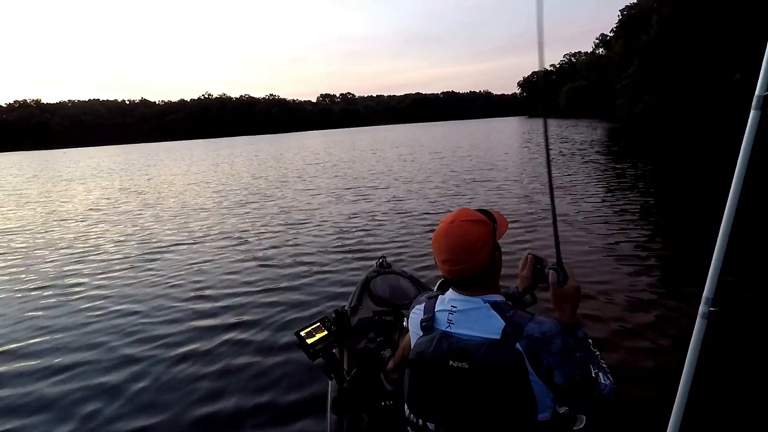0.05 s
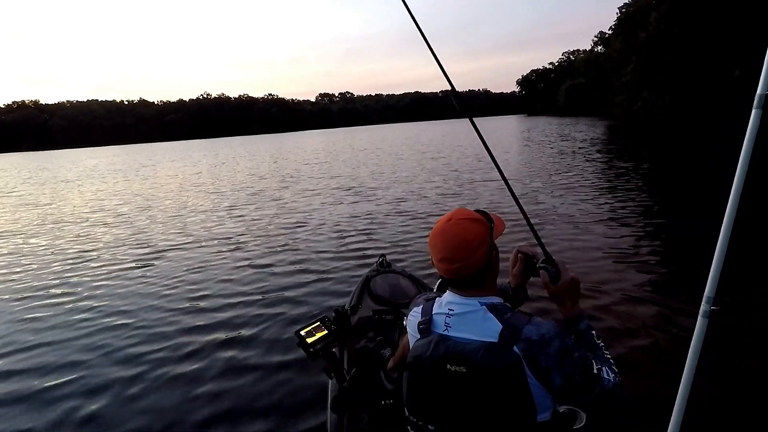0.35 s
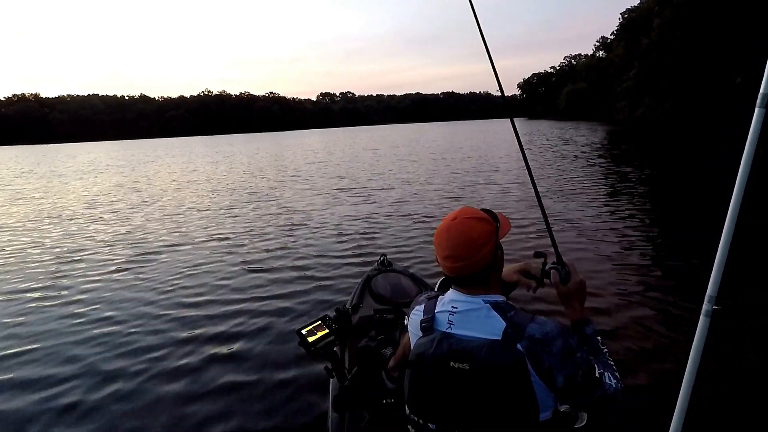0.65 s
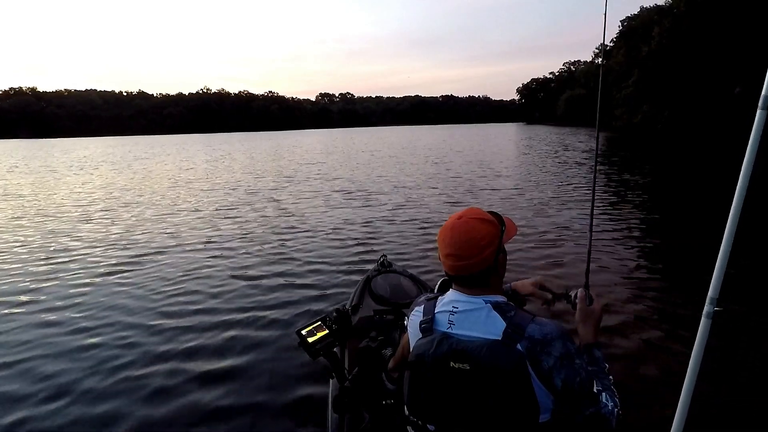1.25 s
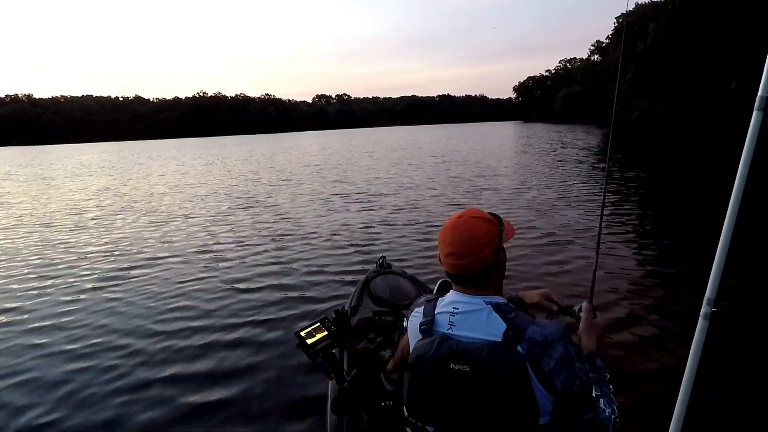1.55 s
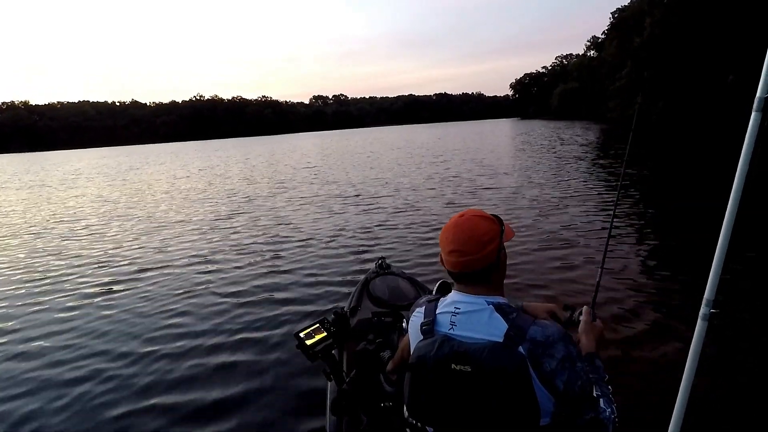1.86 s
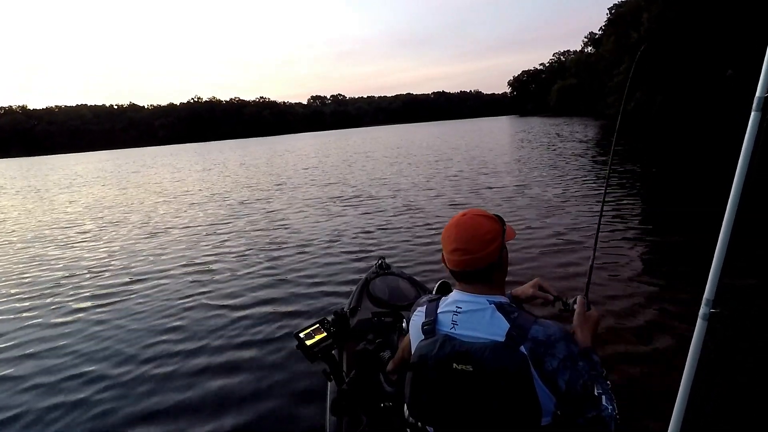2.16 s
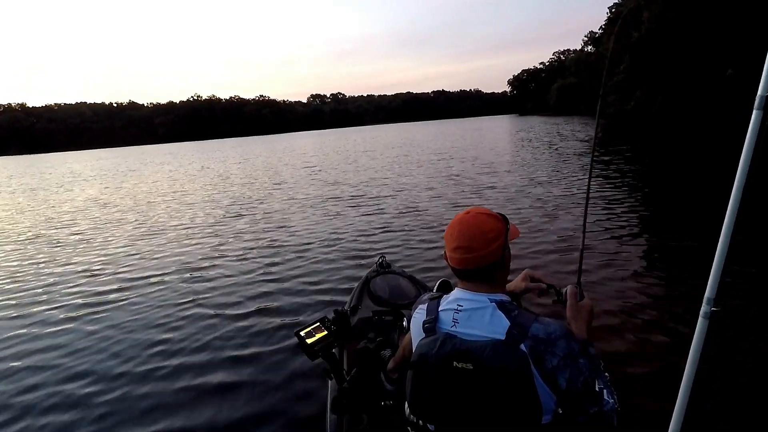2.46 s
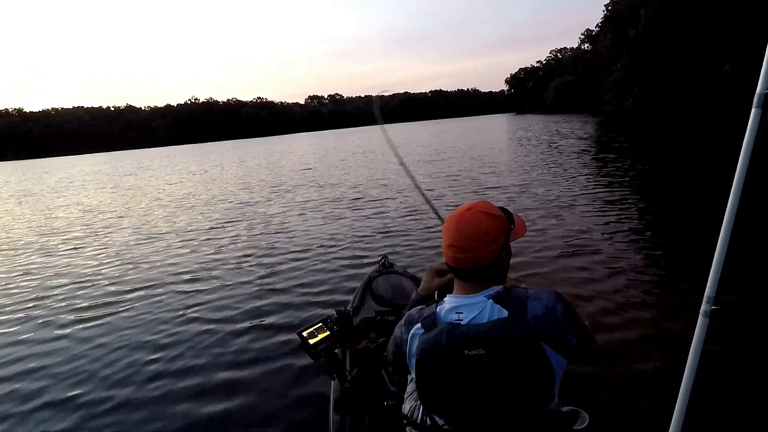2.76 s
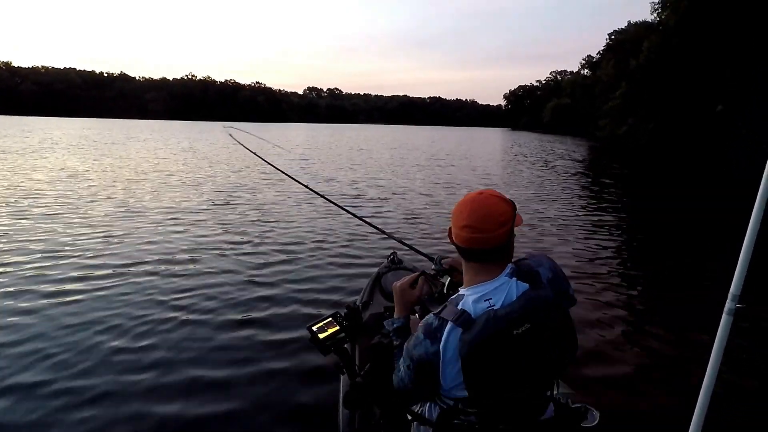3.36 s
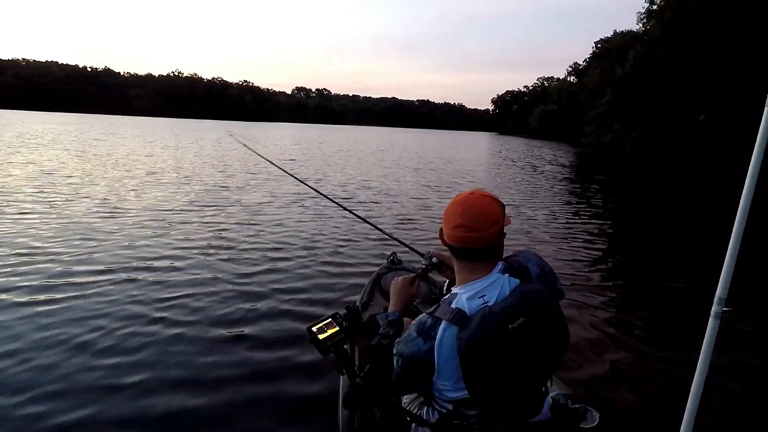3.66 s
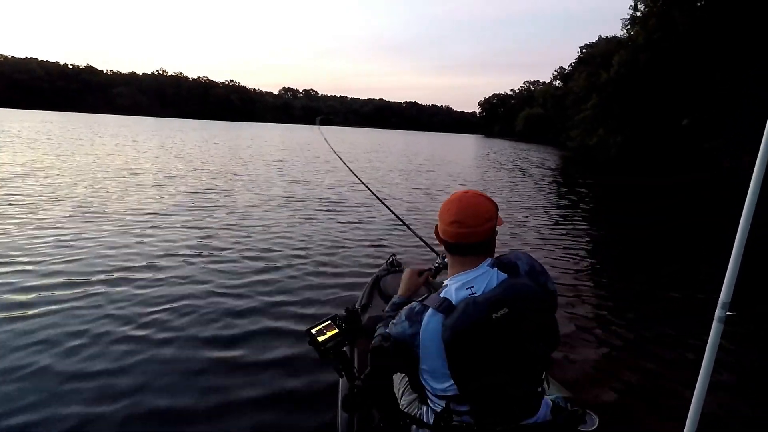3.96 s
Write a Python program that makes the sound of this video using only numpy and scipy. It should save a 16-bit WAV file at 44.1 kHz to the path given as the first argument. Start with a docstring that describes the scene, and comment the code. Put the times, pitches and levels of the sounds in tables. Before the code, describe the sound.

A bird whistles a fast two-note call again and again from lakeside woods, heard from a kayak amid low wind and water rumble and faint insects. A reel clicks; as the song ends, the angler's seat creaks and knocks.

```python
"""On a calm lake at dusk, a kayak drifts. On the wooded shore a songbird repeats a rising and a falling
whistle five times a second over a steady insect hiss. Water and light wind rumble on the hull.
The fishing reel clicks, then the angler sweeps the rod back, and seat and tackle creak, knock
and rustle."""
import sys
import numpy as np
from scipy import signal
from scipy.fft import rfft, irfft, next_fast_len
from scipy.io import wavfile
from scipy.ndimage import map_coordinates

SR = 44100
rng = np.random.default_rng(int(sys.argv[2]) if len(sys.argv) > 2 else 0)


def master(y):
    """Save y as 16-bit WAV."""
    cut = np.clip(np.atleast_2d(y).T, -1, 1)
    pcm = np.round(cut * 32767)  # scale
    wavfile.write(sys.argv[1], SR, pcm.astype(np.int16))


N = 176400  # 4 seconds

# Strength of the breeze and of the small waves it drives. Each row: time in seconds, level in dB.
GUSTS = [(0, -21.5), (.5, -22), (.57, -17.5), (.76, -20.5), (.95, -13.5), (1.15, -18), (1.44, -17.5),
         (1.55, -14.5), (1.68, -15.5), (1.88, -12), (1.97, -19), (2.19, -12.5), (2.33, -20.5),
         (2.64, -16.5), (2.82, -22), (3.15, -26), (3.27, -23), (3.6, -29), (3.83, -20), (4, -28.5)]


def bird():
    """Each call scoops up, pauses, then slides down from nearly an octave above. The woods echo it."""
    # The two notes. Each row: seconds into the call, multiple of the call's pitch, relative level in dB.
    rising_note = [(0, .555, -7), (.025, .565, -3), (.04, .615, -3), (.055, .69, -.5), (.064, .705, -4)]
    falling_note = [(.076, 1.31, -14), (.088, 1.2, -3.5), (.104, 1.06, -5), (.119, .905, -2.5),
                    (.134, .77, .5), (.146, .73, -4)]
    # How loud each note is as the song goes on. Each row: time in seconds, level in dB.
    rising_level = [(.2, -44.5), (1.4, -48), (3.0, -58)]
    falling_level = [(.2, -49), (1.8, -47), (3.0, -50.5)]
    first_call_s, period_s, slowing_s = .122, .1995, .00023
    first_hz, settled_hz, settle_s = 3590, 2857, 1.5  # the pitch sags as the song goes on
    song = np.zeros(N)
    for call in range(15):
        start = first_call_s + call * period_s + slowing_s * call ** 2
        hz = settled_hz + (first_hz - settled_hz) * np.exp(-(start - first_call_s) / settle_s)
        break_db = 3.2 * start  # the middle of the falling note breaks up more with each call
        for note, level, dip_db in (rising_note, rising_level, 0), (falling_note, falling_level, break_db):
            gain = amp(np.interp(start, *np.transpose(level)))
            add(song, start + note[0][0], gain * whistle(note, hz, dip_db))
    song = song + amp(-8) * echo(song, t60=.09)  # nearby leaves smear the notes
    return song + amp(-11.5) * echo(song, t60=.51)  # the longer echo of the woods


def whistle(note, hz, dip_db, waver=.013, flutter_db=2, edge_s=.0071):
    """One pure, slightly unsteady note with soft edges. Its level dips near the middle."""
    times, ratios, levels = np.transpose(note)
    t = np.arange(times[0], times[-1], 1 / SR)
    from_edge_s = np.minimum(t - t[0], t[-1] - t)
    edges = np.sin(np.pi / 2 * np.clip(from_edge_s / edge_s, 0, 1))
    pitch = hz * np.interp(t, times, ratios) * (1 + waver * wobble(196, size=len(t)))
    progress = np.linspace(0, 1, len(t))
    dip = dip_db * np.exp(-((progress - .43) / .17) ** 2)
    db = np.interp(t, times, levels) - dip + rng.normal() + flutter_db * wobble(129, size=len(t))
    return edges * amp(db) * np.sin(2 * np.pi * np.cumsum(pitch) / SR)


def knocks():
    """Seat and tackle slip under load: a dry snap, a short hollow ring, a rattle and a boom in the hull."""
    # The slips. Each row: start in seconds, snap level in dB, ring level in dB, ring pitch in Hz.
    slips = [(2.619, -28, -26.5, 1117), (2.635, -29, -27, 900), (2.655, -24.5, -24, 1120),
             (2.686, -26, -24, 1100), (2.716, -26.5, -26.5, 1113), (2.737, -27.5, -30.5, 846),
             (2.763, -24.5, -24, 1110), (2.861, -24.5, -23.5, 1051), (2.909, -26.5, -25, 840),
             (2.935, -28.5, -20.5, 760), (2.988, -35, -23, 762), (3.031, -32, -24.5, 717),
             (3.076, -35, -25.5, 658), (3.133, -29, -30, 828), (3.208, -46, -29.5, 1390),
             (3.221, -33, -24.5, 777), (3.383, -32, -27, 786), (3.458, -28, -35, 873),
             (3.749, -28, -26.5, 665), (3.837, -32, -28, 810), (3.889, -30, -34, 890),
             (3.955, -29.5, -30.5, 844)]
    # Dry ticks as the tackle settles after a knock. Each row: start in seconds, level in dB.
    ticks = [(2.665, -33), (2.998, -30), (3.04, -34.5), (3.231, -31), (3.471, -32.5), (3.771, -34)]
    # The hollow ring. Each row: multiple of the ring pitch, relative level in dB, fade time in seconds.
    hollow_tones = [(0.269, -2.5, 0.12), (0.519, -4.5, 0.048), (.77, -4, 0.069), (1.002, 0, 0.053),
                    (1.649, -14, 0.027)]
    # The hull's boom. Each row: pitch in Hz, relative level in dB, fade time in seconds.
    hull_tones = [(214, 0.5, .09), (293, -2, 0.073), (383, -9, 0.083)]
    # The boom follows the load as the angler leans back. Each row: time in seconds, level in dB.
    boom_level = [(2.6, -27), (2.64, -13.5), (2.76, -23.5), (2.9, -30)]
    # Tone of the snaps and of the rattle. Each row: frequency in Hz, relative level in dB.
    snap_colour = [(300, 5.5), (1000, 2), (1900, 1), (2700, -2), (6500, -5), (8500, -17), (14000, -37)]
    rattle_colour = [(120, -9), (380, 4.5), (520, -8.5), (750, 4), (1300, -13), (1750, -6), (3000, -41)]
    snaps, body, rattle = np.zeros((3, N))
    snap_shape = onset(.0005) * (fade(.009) + amp(-18) * fade(.11))  # a sharp hit with a faint tail
    soft_start = onset(.003)
    for start, snap_db, *_ in slips + ticks:
        add(snaps, start, amp(snap_db) * snap_shape)
    for start, _, ring_db, hz in slips:
        tones = [(hz * ratio, db, t60) for ratio, db, t60 in hollow_tones]
        add(body, start, amp(ring_db) * soft_start * ring(tones, scatter_db=2))
        boom_db = np.interp(start, *np.transpose(boom_level))
        add(body, start, amp(boom_db) * soft_start * ring(hull_tones, scatter_db=3))
        add(rattle, start, amp(ring_db - 2) * soft_start * fade(.063))
    return snaps * noise(snap_colour) + body + rattle * noise(rattle_colour)


def reel():
    """Each click is a bright crack that rings the reel's small metal parts."""
    # The clicks. Each row: start in seconds, then the levels of crack, low ring and high ring in dB.
    clicks = [(.737, -34, -42, -51), (.748, -20, -31.5, -47), (1.444, -55, -39.5, -63),
              (3.117, -38, -37, -41)]
    # The ringing metal. Each row: pitch in Hz, relative level in dB, fade time in seconds.
    low_tones = [(1610, -4.5, 0.048), (1820, -1, 0.017), (2230, -2, 0.02)]
    high_tones = [(4030, -1, 0.064), (8100, -4.5, 0.07), (9450, -5.5, 0.036)]
    # Tone of the crack. Each row: frequency in Hz, relative level in dB.
    crack_colour = [(1000, 5.5), (3300, -19), (5500, 4), (8200, 7), (11000, -2), (14000, -10)]
    cracks, metal = np.zeros((2, N))
    for start, crack_db, low_db, high_db in clicks:
        add(cracks, start, amp(crack_db) * onset(.0004) * fade(.0055))
        add(metal, start, amp(low_db) * ring(low_tones, scatter_db=1))
        add(metal, start, amp(high_db) * ring(high_tones, scatter_db=1))
    return cracks * noise(crack_colour) + metal


def water():
    """The hull rumbles and ripples wash along it. Slapped pockets of air ring and rise in pitch."""
    # Slaps under the hull. Each row: start in seconds, first pitch in Hz, level in dB, fade in seconds.
    air_pockets = [(0.545, 85, -4.5, 0.058), (0.554, 396, -17, 0.063), (.588, 490, -20, 0.058),
                   (1.484, 119.4, -1, 0.094), (1.551, 117.5, -1, 0.13), (1.849, 112.4, -6, 0.22),
                   (2.918, 144.2, -11.5, 0.16), (3.718, 197, -4.5, 0.051), (3.834, 178.3, -12.5, 0.19)]
    # How loud the rumble is. Each row: time in seconds, dB added to the gust level.
    rumble_offset = [(.4, -3.5), (.8, -2.5)]
    # How the ripples swell. Each row: time in seconds, relative level in dB.
    ripple_level = [(0, -46), (.5, -45), (.6, -41.5), (1.3, -42), (2.45, -39), (2.7, -37), (3.25, -38),
                    (3.62, -37), (3.95, -34.5)]
    # Tone of the rumble and of the ripples. Each row: frequency in Hz, relative level in dB.
    rumble_colour = [(30, -69), (70, 0), (115, -2), (170, -6), (250, -17), (350, -27.5), (600, -34),
                     (2000, -80.5)]
    ripple_colour = [(100, -5.5), (330, 6.5), (1100, -12.5), (1600, -31), (3000, -36), (8000, -53),
                     (15000, -52)]
    glide_per_s = 1.24  # pitch gained in a second, as a multiple of the first pitch
    slaps, t = np.zeros(N), np.arange(SR // 4) / SR
    for start, hz, db, t60 in air_pockets:
        rising_tone = np.sin(2 * np.pi * hz * t * (1 + glide_per_s * t / 2))
        add(slaps, start, amp(db) * fade(t60) * onset(.0027) * rising_tone)
    rumble = amp(curve(GUSTS) + curve(rumble_offset) + 2.65 * wobble(29.997)) * noise(rumble_colour)
    ripples = amp(curve(ripple_level) + 1.5 + 1.5 * wobble(30)) * noise(ripple_colour)
    return slaps + rumble + ripples


def wind():
    """Light wind buffets the microphone with a very deep rumble."""
    # How hard it buffets. Each row: time in seconds, dB added to the gust level.
    buffet_offset = [(.5, .5), (2.8, -3)]
    # Tone of the wind. Each row: frequency in Hz, relative level in dB.
    wind_colour = [(8, -13), (22, -4), (45, 6), (70, -8), (110, -13), (1000, -120)]
    return amp(curve(GUSTS) + curve(buffet_offset) + wobble(11)) * noise(wind_colour)


def rustle():
    """Clothes and line rub in small bursts while the angler works the rod."""
    # How loud the rubbing is. Each row: time in seconds, level in dB.
    rub_level = [(2.58, -67), (2.63, -41), (3.0, -44), (3.25, -40), (3.6, -46), (3.95, -50.5)]
    # Tone of the rubbing. Each row: frequency in Hz, relative level in dB.
    rub_colour = [(200, 2), (700, 6), (1200, -1.5), (2000, -8), (3500, -20), (6000, -18.5), (9000, -42),
                  (15000, -47)]
    bursts = amp(2.5 * wobble(45) + 3.5 * wobble(400))
    return amp(curve(rub_level)) * unit(bursts * noise(rub_colour))


def shore(insect_db=-54.5, air_db=-52):
    """A distant insect chorus hisses over the hush of still air."""
    # Tone of the insects and of the air. Each row: frequency in Hz, relative level in dB.
    insect_colour = [(3000, -50), (5000, -14), (5700, 1), (7050, 2.8), (7700, -9), (9500, -9.5),
                     (12000, -30)]
    air_colour = [(200, 1), (1300, 1.5), (2200, 0), (4800, -7.5), (8000, -17), (10000, -9.5), (11500, -15),
                  (14000, -19), (15300, -31)]
    insects = amp(insect_db + .53 * wobble(40)) * noise(insect_colour)
    return insects + amp(air_db) * noise(air_colour)


def amp(db):
    """Turn decibels into a number to multiply a sound by."""
    return 10 ** (np.asarray(db) / 20)


def unit(x):
    """Scale a sound to an average (rms) level of 1."""
    return x / np.sqrt(np.mean(x ** 2) + 1e-20)


def curve(rows):
    """Join (seconds, value) rows with straight lines, giving one value per sample."""
    return np.interp(np.arange(N) / SR, *np.transpose(rows))


def wobble(rate, size=N):
    """A smooth curve through `rate` random points a second."""
    points = rng.standard_normal(int(size * rate / SR) + 4)
    return map_coordinates(points, [np.arange(size) * rate / SR])


def filtered(x, response):
    """Multiply each frequency in x by response(hz)."""
    size = next_fast_len(N + SR // 2)
    return irfft(rfft(x, size) * response(np.fft.rfftfreq(size, 1 / SR)), size)[:N]


def noise(colour):
    """Noise at an average level of 1, its tone shaped by (Hz, dB) rows."""
    freqs, db = np.transpose(colour)
    white = rng.standard_normal(N)
    return unit(filtered(white, lambda hz: amp(np.interp(np.log(hz + 1), np.log(freqs), db))))


def add(track, start, sound):
    """Mix a sound into the track, `start` seconds in."""
    part = track[max(round(start * SR), 0):][:len(sound)]
    part += sound[:len(part)]


def onset(rise_s):
    """A quarter second that builds up from silence."""
    return 1 - np.exp(-np.arange(SR // 4) / SR / rise_s)


def fade(t60):
    """A quarter second that dies away. The fade time t60 is the seconds it takes to drop 60 dB."""
    return np.exp(-np.log(1000) * np.arange(SR // 4) / SR / t60)


def ring(tones, scatter_db):
    """A struck object's fading (Hz, dB, fade time) tones, a little different with each hit."""
    t = np.arange(SR // 4) / SR
    sound = np.zeros(len(t))
    for hz, db, t60 in tones:
        strength = amp(db + scatter_db * rng.normal()) * rng.choice([-1, 1])
        sound += strength * fade(t60) * np.sin(2 * np.pi * hz * t)
    return sound


def echo(x, t60):
    """Scatter a sound into a dense tail that fades in t60 seconds."""
    tail = rng.standard_normal(SR) * np.exp(-np.log(1000) * np.arange(SR) / SR / t60)
    return signal.fftconvolve(x, tail / np.linalg.norm(tail))[:N]


def scene():
    """Everything as heard from the back of the kayak, in one channel."""
    return (bird() + knocks() + reel() + water() + wind() + rustle() + shore())[None]


def record(dry):
    """Cut off the very highest treble."""
    return np.array([filtered(x, lambda hz: hz < 15250) for x in dry])


dry = scene()
out = record(dry)
master(out)
```